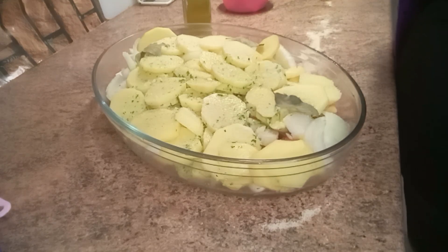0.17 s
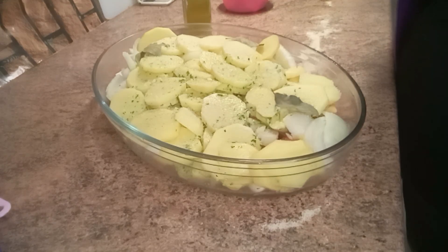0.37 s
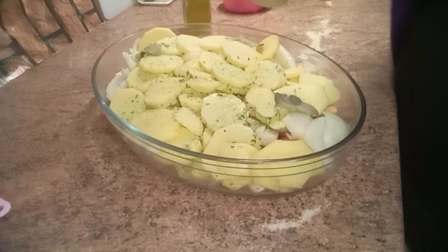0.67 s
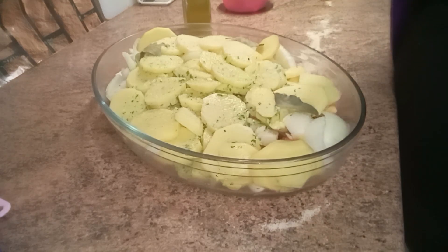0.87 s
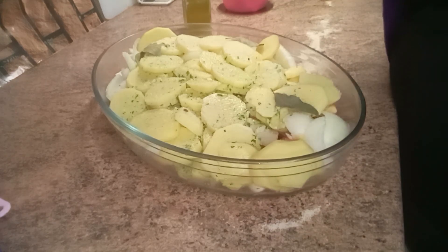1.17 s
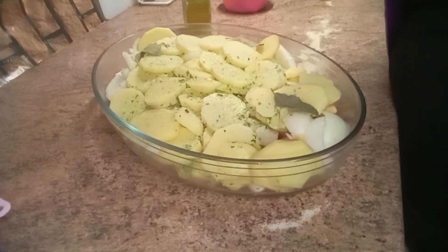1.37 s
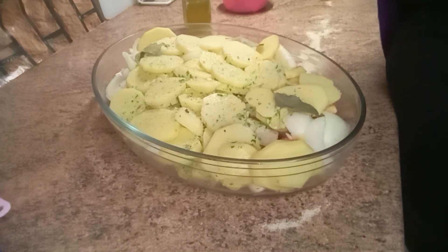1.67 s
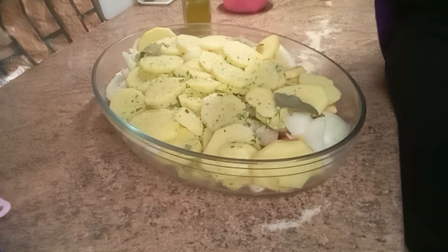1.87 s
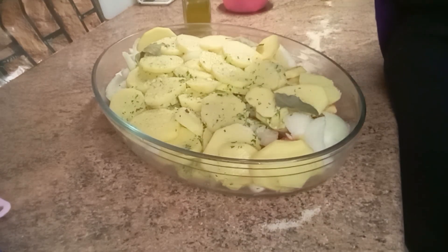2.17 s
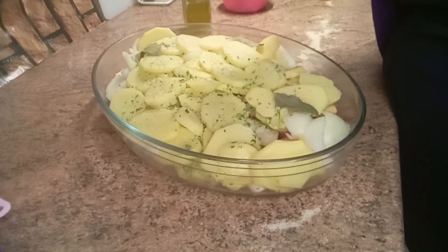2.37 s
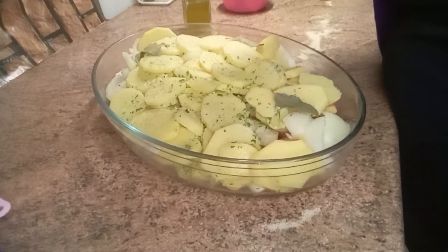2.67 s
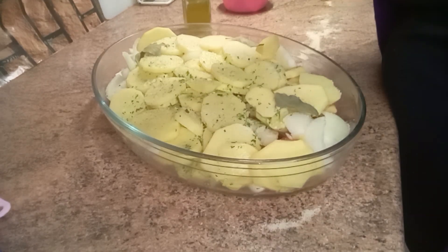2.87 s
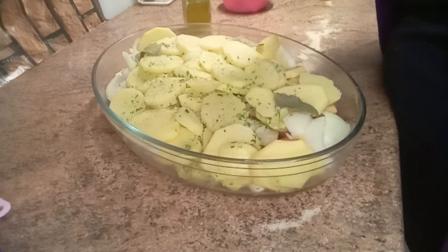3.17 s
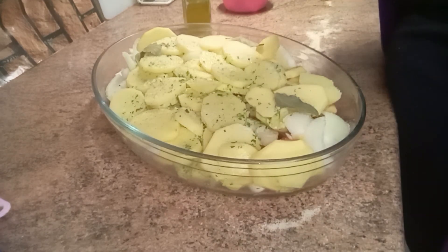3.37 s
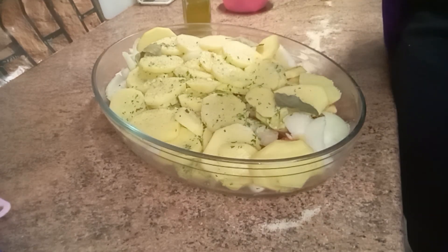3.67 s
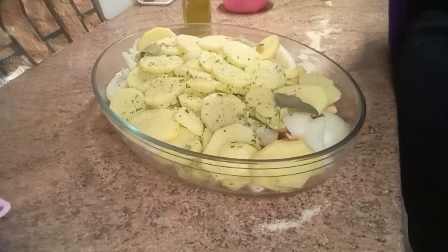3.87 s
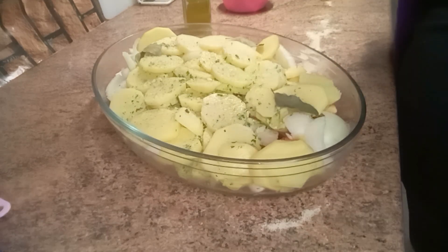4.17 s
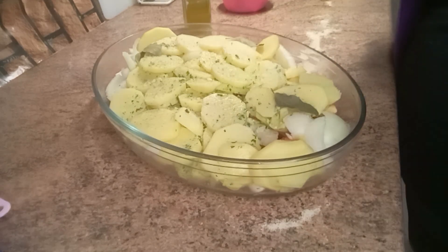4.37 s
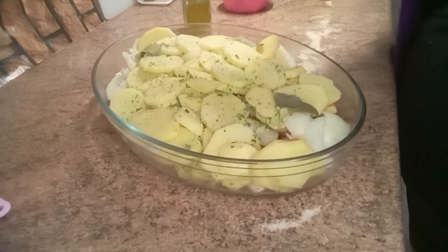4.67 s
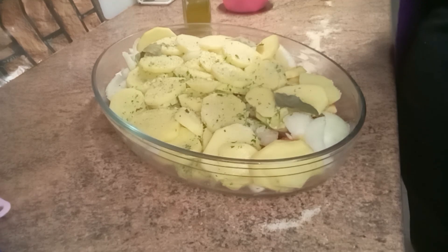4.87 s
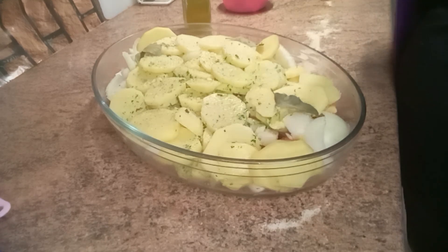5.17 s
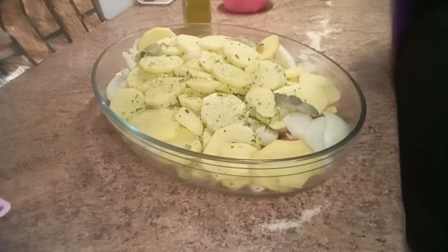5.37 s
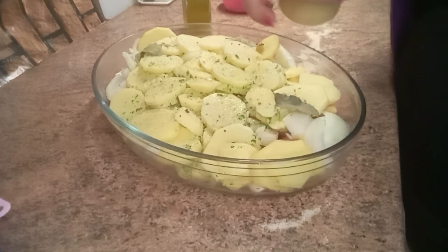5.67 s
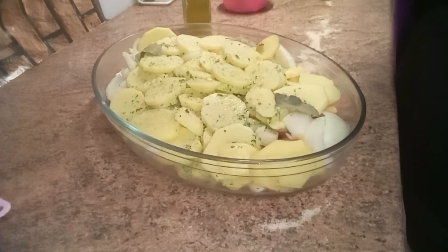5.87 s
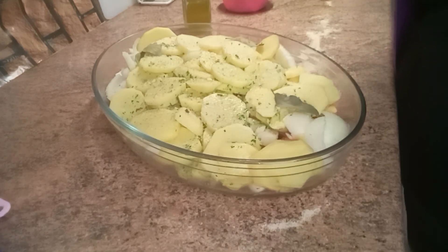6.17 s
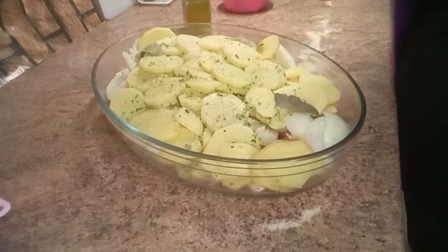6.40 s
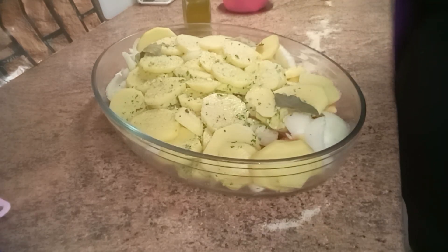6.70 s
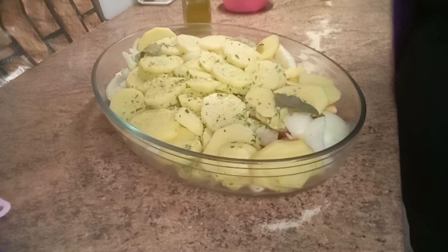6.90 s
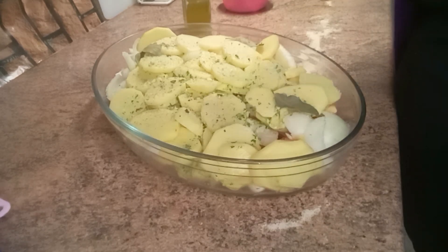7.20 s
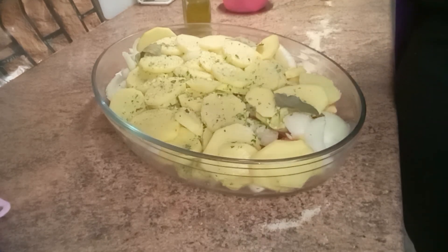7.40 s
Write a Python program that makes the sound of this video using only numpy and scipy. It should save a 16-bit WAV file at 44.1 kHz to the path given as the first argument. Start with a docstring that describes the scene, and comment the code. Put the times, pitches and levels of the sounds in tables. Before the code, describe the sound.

For about 7.5 seconds a pepper mill is ground by hand in a steady rhythm, one twist roughly every 0.4 seconds. The first crunch is already under way at 0; others bite near 0.4, 0.75, 1.2, 1.6 and 2.0, continuing evenly to a last one at 7.3. Each is a dry, gritty burst of 0.1 to 0.2 seconds with sharp cracks, then crumbs settle into sparse ticks, and a faint bright scrape swells into the next bite. Especially hard cracks come near 1.6, 2.95, 4.6, 5.75 and loudest at 6.5-6.6. Small hollow knocks fall around 1.85, 4.1 and 6.5, a faint low bump at 5.4, and tiny squeaks near 1.1, 2.0 and 5.7. The hard kitchen adds a short, bright echo. Quiet rumbling room tone, faint fridge hum and wavering thin hiss lie beneath.

```python
"""Pepper mill in a kitchen.

A pepper mill is twisted by hand, some five twists in two seconds, over a dish in a hard-walled kitchen.
Peppercorns crack as filtered noise bursts, crumbs crunch as dense random snaps, and the room rings on
as noise tails. Single ticks, scrapes up to the bites, knocks and one bump of the mill join in.
A fridge hums behind as wavering sines, over room tone and a thin hiss; now and then a gliding sine whistles."""
import sys
import numpy as np
from scipy import signal
from scipy.fft import rfft, irfft
from scipy.io import wavfile
from scipy.ndimage import uniform_filter1d

SR = 44100
rng = np.random.default_rng(int(sys.argv[2]) if len(sys.argv) > 2 else 0)


def store_pcm(level_fs):
    """Save levels as 16-bit WAV."""
    pcm = np.round(np.clip(level_fs, -1, 1) * 32767).astype(np.int16)
    wavfile.write(sys.argv[1], SR, np.atleast_2d(pcm).T)


N = 332514

# The cracks and ticks that stand out. Each row: start in seconds, peak in dB, bass in dB and treble in dB
# against the mill's usual colour, ring in Hz.
BIG_CRACKS = [(0.019, -29.5, 23, 19, 6540), (0.086, -29.5, -8, 0, 5950), (0.311, -51, -14, -8, 4700),
              (0.3595, -35, 1, -9, 4690), (0.372, -15, 7.5, -8, 4500), (0.382, -18, -2, 10, 4930),
              (0.4018, -24, -3, -3, 4500), (0.4408, -21.5, -11, -1.5, 4660), (0.468, -22.5, 8.5, 3, 4510),
              (0.827, -15, 11.5, -1, 1836), (0.865, -28.5, 15, -6.5, 4920), (.878, -14.5, -3, 7, 6330),
              (0.885, -16.5, 1, 3, 5000), (1.2235, -15.5, -24, -1, 4760), (1.2399, -14, -4, 11.5, 6780),
              (1.263, -24, 15, 10, 6970), (1.2862, -17, 8, 7, 1970), (1.611, -10, 3, -7, 4370),
              (1.637, -13.5, 3, 6.5, 4400), (1.662, -23, 11, -3, 4400), (1.7128, -20.5, -4.5, -3, 7600),
              (1.7512, -25, 3, 8, 7300), (2.0123, -28.5, 11.5, -2, 1004), (2.0554, -14.5, -6, -1, 4400),
              (2.0666, -18, 5.5, -5, 4550), (2.11, -22.5, 1.5, 2, 1373), (2.152, -29, 5, -15, 2324),
              (2.205, -40.5, -8, -8, 5370), (2.377, -54.5, 8.5, -10, 5000), (2.432, -21, -26, -10, 4810),
              (2.4463, -18, 13.5, 1, 6200), (2.4638, -19, -5.5, 1, 6480), (2.4815, -28, 9, -9.5, 5960),
              (2.5158, -20.5, 1, 2.5, 5830), (2.849, -33.5, -18, -23, 5160), (2.9011, -18.5, 0, 3, 3470),
              (2.9166, -23.5, 10, -2, 5330), (2.9568, -9, 0.5, 10, 12800), (2.993, -22, -1.5, 2.5, 6900),
              (3.073, -32, -15, 20, 8900), (3.132, -34, -13, 12, 6200), (3.208, -49, -13, 17.5, 6400),
              (3.22, -49.5, -1, 3, 6300), (3.289, -20.5, -10, -1, 6940), (3.3091, -14.5, -2, -9, 7100),
              (3.3952, -23, 0, -2.5, 7240), (3.408, -21.5, 0, -2, 5200), (3.637, -53, -5.5, 23, 8610),
              (3.6929, -29, -14, -30, 4260), (3.707, -32, -0.5, -24.5, 4100),
              (3.7825, -21.5, -1.5, -5, 4210), (3.798, -23.5, -7, 0.5, 4140), (3.8195, -26, -14, 6.5, 4110),
              (4.1308, -30.5, 6, -15.5, 4240), (4.138, -17.5, 0, -2.5, 4255), (4.17, -18, -1, 4, 5170),
              (4.1761, -23.5, -9, 6.5, 5000), (4.196, -26, 3, -3, 3200), (4.2534, -28, -2.5, -11.5, 4470),
              (4.5185, -22.5, -6, -5.5, 940), (4.5235, -16.5, 2, 2, 935), (4.589, -21.5, 3, 2, 1510),
              (4.595, -9, 3, 3.5, 5600), (4.758, -40.5, -1, 2.5, 7130), (4.802, -51, 8, 11.5, 5500),
              (4.9711, -26.5, 8.5, -22.5, 5900), (4.981, -38.5, 6, -2.5, 2740),
              (5.0766, -28.5, 5, 11.5, 6670), (5.1928, -23.5, -13, 21.5, 5240),
              (5.3019, -42, -4.5, -0.5, 6550), (5.349, -26.5, -18, -4.5, 5520),
              (5.362, -19.5, -11, -9, 4080), (5.3727, -12.5, -2, 1, 4310), (5.4147, -21.5, -15, 5, 4320),
              (5.4612, -14.5, -6.5, 1.5, 1917), (5.4834, -22.5, -25, -18, 5600),
              (5.6005, -37, -1, 10.5, 6890), (5.716, -24, -4.5, 2.5, 4400), (5.7302, -19, -14, -14.5, 2660),
              (5.7416, -10.5, -2, -3.5, 4400), (5.752, -17.5, -4, 3, 4650), (5.77, -20.5, 7.5, 9.5, 6500),
              (5.789, -22.5, 12.5, 6, 6600), (5.8484, -27.5, 7, 4.5, 5960), (6.108, -51, -8, 14, 9390),
              (6.1499, -17.5, 2, -2, 2174), (6.248, -37.5, -3, 12, 8950), (6.499, -28, -3, -12, 4600),
              (6.528, -20.5, 18.5, 17, 6700), (6.538, -8.5, -47, -20, 4540), (6.5544, -24.5, -2, 3, 4130),
              (6.5995, -3.5, -4.5, -10, 2405), (6.61, -8, -13, 10.5, 5200), (6.945, -15.5, -3, -3, 4300),
              (6.9556, -14.5, 2.5, -2, 4760), (7.027, -19.5, -3.5, -16, 4030), (7.033, -21, 6, 5, 4530),
              (7.1572, -29.5, -15.5, 21, 6200), (7.203, -31.5, -31, 25, 7620), (7.298, -23, -1, 6, 6670),
              (7.361, -26.5, 12, -3, 3680)]
# Turns of the hand. Each row: bite of the burrs in seconds, length in seconds, crunch in dB at the bite,
# crunch in dB as the hand stops, scrape in dB just before the bite, swell in dB per second, treble in dB.
HAND_TURNS = [(0.0, 0.082, -34.5, -52, -70, 1700, 2.5), (0.373, 0.12, -41, -47, -64, 1500, 0),
              (0.751, 0.15, -45, -38.5, -71, 1700, 0), (1.218, 0.12, -36, -47.5, -56, 600, 1),
              (1.602, 0.15, -43.5, -47, -70, 1700, 0), (2.004, 0.15, -45, -52, -61, 2498, 3.5),
              (2.447, 0.11, -36, -44.5, -73, 1002, 0.5), (2.849, 0.17, -45.5, -37, -66.5, 1500, -1),
              (3.288, 0.15, -38, -45.5, -62.5, 900, -1.5), (3.703, 0.11, -49, -39, -74, 1402, -3),
              (4.135, 0.13, -42, -55.5, -72.5, 1700, 2.5), (4.527, 0.14, -43, -44.5, -73.5, 1702.5, -1.5),
              (4.949, 0.11, -45, -47.5, -78, 1197, 1.5), (5.372, 0.081, -30.5, -64, -72.5, 1197, -2),
              (5.727, 0.13, -44, -48.5, -73, 1497, 1), (6.133, 0.12, -38, -49, -68, 1500, 0.5),
              (6.501, 0.2, -39, -41, -71, 1703, 3), (6.933, 0.13, -30.5, -53.5, -58.5, 803, 0),
              (7.304, 0.1158, -37.5, -50.5, -81, 1700, -2.5)]

TREBLE_HZ = 7150   # where the treble of cracks and crunch begins
SIZE = 4096   # samples in a filter response
HZ = np.maximum(np.fft.rfftfreq(SIZE, 1 / SR), 1)


def from_db(db):
    """Decibels to gain."""
    return 10 ** (np.asarray(db) / 20)


def rms_one(x):
    """Scale to rms 1."""
    return x / np.sqrt(np.mean(x ** 2) + 1e-20)


def at_hz(points, hz):
    """Read a table on a log-frequency axis."""
    table_hz, values = np.transpose(points)
    return np.interp(np.log(hz), np.log(table_hz), values)


def drift(rate_hz):
    """Slow chance: noise at every 16th sample, twice through a one-pole low-pass; spread 1."""
    pole = np.exp(-2 * np.pi * rate_hz * 16 / SR)
    noise = rng.standard_normal(N // 16 + 3002)
    slow = signal.lfilter([1], [1, -2 * pole, pole ** 2], noise)[3000:]   # settled part only
    return np.interp(np.arange(N) / 16, np.arange(len(slow)), rms_one(slow))


def bump(hz, width_hz):
    """Resonance curve, 1 on top, one half at half the width to either side."""
    return 1 / (1 + (2 * (HZ - hz) / width_hz) ** 2)


def causal(db):
    """Minimum-phase spectrum for a dB curve, by folding its cepstrum."""
    cepstrum = irfft(np.log(from_db(db)))
    cepstrum[..., 1:SIZE // 2] *= 2
    cepstrum[..., SIZE // 2 + 1:] = 0
    return np.exp(rfft(cepstrum))


def colour(x, db):
    """Causal filter of unit power gain."""
    response = irfft(causal(db))
    return signal.fftconvolve(x, response / np.sqrt(np.sum(response ** 2)))[:N]


def room_tone(wander_db):
    """Steady coloured noise whose rumble swells and sinks."""
    # Colour of the air in the room. Each row: frequency in Hz, relative level in dB per Hz.
    air_colour = [(25, -23.5), (50, -1), (100, 1), (250, -2.5), (500, -10.5), (1000, -15.5), (2000, -17),
                  (3600, -29.5), (4800, -32.5), (7000, -21), (8200, -25), (13400, -29.5), (14900, -26.5),
                  (16500, -29)]
    air = from_db(-73) * colour(rng.standard_normal(N), at_hz(air_colour, HZ))
    rumble = signal.sosfilt(signal.butter(1, 400, fs=SR, output="sos"), air)
    swell = from_db(wander_db * drift(8.7))
    return air + (swell - 1) * rumble


def fridge(waver_db):
    """Multiples of the motor speed, each wavering on its own in level and phase."""
    # Each row: multiple of the motor speed, rms level in dB.
    hum_lines = [(2, -90.5), (5, -79.5)]
    motor_hz = 48.5
    turn = 2 * np.pi * motor_hz * np.arange(N) / SR
    out = np.zeros(N)
    for multiple, db in hum_lines:
        level = np.sqrt(2) * from_db(db + waver_db * drift(6.2))
        out += level * np.sin(round(multiple) * turn + 0.9 * drift(9.8))
    return out


def thin_hiss(throb_db):
    """Noise through one narrow resonance; it comes and goes and throbs unsteadily."""
    # Each row: time in seconds, level in dB before the throb.
    hiss_levels = [(0, -84.5), (1.3, -73.5), (1.9, -90), (2.3, -100), (5.4, -100), (5.7, -89.5),
                   (6.45, -77.5), (6.8, -95.5), (7.54, -101)]
    centre_hz, width_hz = 7350, 450
    hiss = colour(rng.standard_normal(N), 40 * np.log10(bump(centre_hz, width_hz)))   # resonance squared
    level_db = np.interp(np.arange(N) / SR, *np.transpose(hiss_levels))
    return from_db(level_db + throb_db * drift(6.5)) * hiss


def effort():
    """Crunch level: swell, steady turn and stop for each twist, plus the shards of every big crack."""
    stop_db_per_s = 698.5   # how fast the crunch dies after the stop
    shards_db, shards_s = -32, 0.00192   # a split corn feeds the crunch: level against its crack, decay time
    t = np.arange(0, N, 40) / SR
    level = np.zeros(len(t))
    for s, length, first_db, last_db, _, swell_db_per_s, _ in HAND_TURNS:
        turn_db = np.interp(t, [s, s + length], [first_db, last_db])
        before_db = swell_db_per_s * np.maximum(s - t, 0)
        after_db = stop_db_per_s * np.maximum(t - s - length, 0)
        level += from_db(turn_db - before_db - after_db)
    s, peak_db = np.transpose(BIG_CRACKS)[:2]
    splits = np.zeros(N)
    splits[(s * SR).astype(int)] = from_db(peak_db + shards_db)
    shards = signal.lfilter([1], [1, -np.exp(-1 / (shards_s * SR))], splits)
    return np.interp(np.arange(N) / SR, t, level) + shards


def crunch(per_s, spread_db, lumps_db, count=16):
    """Crumbs snap at random with very uneven sizes, each in a pitch range, in lumps as the burrs bite."""
    shift_db, shifts_hz = 4, 22   # each pitch range swells and sinks on its own
    treble_rise_s = .018   # the crunch starts dull; its treble grows in this slowly
    dust_db = -2.5   # fine dust: smooth hiss in the treble, against the crumbs' snaps
    sizes = from_db(spread_db * np.minimum(rng.exponential(1, N), 5)) * rng.choice([-1, 1], N)
    snaps = sizes * (rng.random(N) < per_s / SR) * from_db(lumps_db * drift(38.0))

    dealt = rng.integers(0, count, N)   # the pitch range of each snap
    edges = np.geomspace(300, 17000, count + 1)
    pitched = np.zeros((count, N))
    for k in range(count):
        band = signal.butter(2, edges[k:k + 2], "band", fs=SR, output="sos")
        ringing = signal.sosfilt(band, snaps * (dealt == k) + 1e-18)
        pitched[k] = from_db(shift_db * drift(shifts_hz)) * ringing

    level = uniform_filter1d(effort(), size=100)
    slow = np.exp(-1 / (treble_rise_s * SR))
    risen = np.minimum(level, signal.lfilter([1 - slow], [1, -slow], level))
    treble_db = np.interp(np.arange(N) / SR, *np.transpose(HAND_TURNS)[[0, -1]])
    treble_level = from_db(treble_db) * risen

    bright = edges[1:] > TREBLE_HZ
    top = pitched[bright].sum(axis=0)
    high_pass = signal.butter(4, TREBLE_HZ, "high", fs=SR, output="sos")
    dust = signal.sosfilt(high_pass, rng.standard_normal(N)) * from_db(lumps_db * drift(30.0))
    top = from_db(-1) * top + from_db(dust_db) * np.std(top) * rms_one(dust)
    low = pitched[~bright].sum(axis=0)
    return (level * low + treble_level * top) / np.std(pitched.sum(axis=0))


def strays(spread_db):
    """Loose crumbs tick inside the mill at all times: sparse faint noise bursts, thin in the bass."""
    per_s, typical_db = 16, -69   # level before the filters
    levels = from_db(typical_db + spread_db * rng.standard_normal(N))
    ticks = (rng.random(N) < per_s / SR) * levels
    grit = signal.lfilter([1], [1, -np.exp(-1 / (0.0007 * SR))], ticks) * rng.standard_normal(N)
    return signal.sosfilt(signal.butter(2, 3500, "high", fs=SR, output="sos"), grit)


def small_corns(count=15):
    """Lesser corns split at random in every turn and as it settles, as rows like the big cracks."""
    settle_s, settle_db_per_s = .12, 171.5   # crumbs go on rattling after the stop, ever fainter
    against_crunch_db, spread_db, colour_db = 1, 4, 8   # the last two: scatter in size and in colour
    s, length, first_db, last_db = np.repeat(HAND_TURNS, count, axis=0).T[:4]
    when = rng.random(len(s)) * (length + settle_s)
    size, bass, treble = rng.standard_normal((3, len(s)))
    ring_hz = 1200 * 5.8 ** rng.random(len(s))
    turn_db = first_db + np.minimum(when / length, 1) * (last_db - first_db)
    settled_db = settle_db_per_s * np.maximum(when - length, 0)
    peak_db = turn_db - settled_db + against_crunch_db + spread_db * size
    return np.transpose([s + when, peak_db, colour_db * bass - 6.0, colour_db * treble - 10.5, ring_hz])


def cracks(mill_db, rise_s, die_s, ring_db, sharpness, steepness):
    """Each corn splits in a few milliseconds of splintering and sets one part of the mill ringing."""
    bass_hz = 2200   # the bass of a crack lies below this
    corns = np.vstack([BIG_CRACKS, small_corns()])
    s, peak_db, bass_db, treble_db, ring_hz = corns.T[:, :, None]
    t = np.arange(SR // 40) / SR
    dying = np.exp(-t / (die_s * rng.uniform(.7, 1.5, (len(s), 1))))
    envelope = np.minimum(t / rise_s, 1) * dying

    bass = bass_db / (1 + (HZ / bass_hz) ** steepness)
    treble = treble_db / (1 + (TREBLE_HZ / HZ) ** steepness)
    own_db = mill_db + bass + treble + ring_db * bump(ring_hz, ring_hz / sharpness)
    for share in rng.random((4, len(s), 1)):   # lesser rings at chance pitches
        lesser_hz = 900 * 8 ** share
        own_db = own_db + .5 * ring_db * bump(lesser_hz, lesser_hz / sharpness)

    splinters = rng.standard_normal((len(s), len(t))) * envelope
    sounds = irfft(rfft(splinters, SIZE) * causal(own_db))
    # the filter changes the colour of a crack, not its level
    energy = np.sum(sounds ** 2, axis=1, keepdims=True) / np.sum(envelope ** 2, axis=1, keepdims=True)
    sounds = from_db(peak_db) * sounds / np.sqrt(energy)
    out = np.zeros(N + SIZE)
    for at, crack in zip((s[:, 0] * SR).astype(int), sounds):
        out[at:at + SIZE] += crack
    return out[:N]


def kitchen(x, first_echo_s, hold=4096):
    """Diffuse echo off hard walls: half-octave bands of noise, each dying at its own rate."""
    # Each row: frequency in Hz, time in seconds for the echo to fall by 60 dB.
    echo_t60 = [(500, 0.29), (1000, 0.28), (2000, 0.27), (2800, 0.35), (4000, 0.3052), (5600, 0.33),
                (8000, 0.21), (15000, 0.2)]
    t = np.arange(SR // 2) / SR
    # the mill moves in the hand, so every short stretch meets a new echo pattern
    stretches = np.pad(x, (0, -N % hold)).reshape(-1, hold)
    white = rfft(rng.standard_normal((len(stretches), len(t))))
    hz = np.fft.rfftfreq(len(t), 1 / SR)
    tails = 0
    for centre_hz in 250 * 2. ** np.arange(0, 6.5, .5):
        band = np.clip(1 - 2 * np.abs(np.log2(hz / centre_hz + 1e-9)), 0, 1)   # neighbours sum to one
        tails = tails + irfft(white * band) * from_db(-60 * t / at_hz(echo_t60, centre_hz))
    tails = tails * np.clip(t / first_echo_s - 1, 0, 1)   # silent until the first echo
    tails = tails / np.sqrt(np.sum(tails ** 2) / len(tails))   # mean energy 1
    out = np.zeros(N + SR)
    for k, echo in enumerate(signal.fftconvolve(stretches, tails, axes=1)):
        out[k * hold:k * hold + len(echo)] += echo
    return out[:N]


def scrape(lumps_db):
    """The burrs scrape faintly before they bite: narrow bright hiss that swells up to each bite."""
    # Resonances of the scrape. Each row: frequency in Hz, width in Hz, relative level in dB.
    scrape_modes = [(4400, 350, -3.5), (5000, 500, -1.5), (6200, 370, -2), (2200, 2000, -14.5)]
    creep_db_per_s = 190   # rate of the swell
    t = np.arange(0, N, 40) / SR
    level = np.zeros(len(t))
    for bite_s, _, _, _, scrape_db, _, _ in HAND_TURNS:
        level += from_db(scrape_db - creep_db_per_s * np.abs(bite_s - t)) * (t < bite_s)
    resonance = sum(from_db(db) * bump(hz, width_hz) for hz, width_hz, db in scrape_modes)
    hiss = colour(rng.standard_normal(N), 20 * np.log10(resonance))
    return np.interp(np.arange(N) / SR, t, level) * from_db(lumps_db * drift(60.0)) * hiss


def whistles(throb_db, waver_hz):
    """Faint whistles and squeaks: gliding sines that waver, throb quickly and fade at both ends."""
    # Each row: start in seconds, length in seconds, first pitch in Hz, last pitch in Hz,
    # rms level in dB before the throb.
    glides = [(2, 0.063, 7180, 7180, -60), (1.048, 0.09, 7050, 6960, -61.5),
              (1.111, 0.03, 7260, 7284, -70.5), (1.078, 0.026, 8800, 7900, -79),
              (1.833, 0.033, 7100, 7050, -67),
              (5.687, 0.042, 7400, 7500, -66)   , (5.9, 0.12, 7700, 7260, -76),
              (6.3, 0.11, 8100, 7360, -80), (3.5, 0.03, 2195, 2120, -67), (4.341, 0.044, 2090, 2150, -67.5)]
    t, out, waver = np.arange(N) / SR, np.zeros(N), waver_hz * drift(70.0)
    for s, length, first_hz, last_hz, db in glides:
        span = slice(int(s * SR), int((s + length) * SR))
        to_nearest_end = np.minimum(t[span] - s, s + length - t[span])
        fade = np.clip(to_nearest_end / 0.0085, 0, 1)
        hz = np.interp(t[span], [s, s + length], [first_hz, last_hz]) + waver[span]
        out[span] += np.sqrt(2) * fade * from_db(db) * np.sin(2 * np.pi * np.cumsum(hz) / SR)
    return out * from_db(throb_db * drift(90.0))


def knocks():
    """The mill's body knocks as the hand regrips: each knock strikes the low and bright modes once."""
    # Each row: start in seconds, level in dB, lowest mode in Hz, bright part in dB.
    regrips = [(1.8471, -40, 1125, 7), (2.7954, -49.5, 1413, -20), (3.242, -49, 1075, -15.5),
               (4.0925, -34.5, 1063, -3.5), (5.2876, -51.5, 1110, -2.5), (6.4679, -33.5, 1076, 1)]
    # Low modes. Each row: multiple of the lowest, relative level in dB, time in seconds to fall by 60 dB.
    low_modes = [(1.0, 0, .016), (1.35, -4, .011), (1.9, -1, .009), (2.3, -4, .009)]
    # Bright modes. Each row: frequency in Hz, relative level in dB, time in seconds to fall by 60 dB.
    bright_modes = [(4300, -3, .006), (5000, 0, .007), (5600, -1, .006), (6300, -5, .005)]
    out, t = np.zeros(N), np.arange(SR // 20) / SR
    for s, db, lowest_hz, bright_db in regrips:
        modes = [(multiple * lowest_hz, mode_db, t60) for multiple, mode_db, t60 in low_modes]
        modes += [(hz, mode_db + bright_db, t60) for hz, mode_db, t60 in bright_modes]
        knock = np.zeros(len(t))
        for hz, mode_db, t60 in modes:
            ring = np.sin(2 * np.pi * (hz * t + rng.random()))
            knock += from_db(db + mode_db - 60 * t / t60) * ring
        out[int(s * SR):][:len(t)] += np.minimum(t / .0015, 1) * knock
    return out


def thump():
    """The hand bumps the mill: one low dying sine."""
    # One row: start in seconds, pitch in Hz, peak in dB, time in seconds to fall by 60 dB.
    hand_bump = (5.371, 320, -55, .15)
    s, hz, db, t60 = hand_bump
    t = np.maximum(np.arange(N) / SR - s, 0)
    return from_db(db - 60 * t / t60) * np.sin(2 * np.pi * hz * t)


def scene():
    """Mill and its echo over the room tone, the fridge, the hiss and the whistles."""
    # Mill and microphone together. Each row: frequency in Hz, relative level in dB per Hz.
    mill_colour = [(180, -65), (300, -31.5), (462, -21), (960, -10), (2100, -5.5), (2390, -3.5),
                   (3170, -6.5), (4730, -3), (6480, -5.5), (8180, -18), (10300, -17.5), (12200, -27.5),
                   (13700, -35.5), (14700, -19), (15900, -21.5)]
    # Mill resonances. Each row: frequency in Hz, width in Hz, lift in dB.
    mill_modes = [(2466, 110, 0), (4106, 42, 6.5), (4690, 950, 5.5), (6540, 1600, 6.5), (9260, 470, 4)]
    mill_db = at_hz(mill_colour, HZ)
    mill_db = mill_db + sum(lift_db * bump(hz, width_hz) for hz, width_hz, lift_db in mill_modes)
    crumbs = colour(crunch(per_s=6500.0, spread_db=3.1, lumps_db=3.8), mill_db)
    ticks = colour(strays(spread_db=3.0), mill_db)
    corns = cracks(mill_db, rise_s=0.0019, die_s=0.002, ring_db=7.0, sharpness=5.0, steepness=6.0)
    mill = corns + crumbs + ticks + scrape(lumps_db=1.0) + knocks()
    echo = from_db(-5.5) * kitchen(mill, first_echo_s=0.0017)
    behind = room_tone(wander_db=4.0) + fridge(waver_db=3.5)
    behind = behind + thin_hiss(throb_db=4.0) + whistles(throb_db=4.0, waver_hz=45.0)
    return (mill + echo + thump() + behind)[None]   # one channel


def record(dry):
    """The top is cut steeply, 60 dB down from 16200 Hz upward."""
    return signal.sosfilt(signal.cheby2(20, 60, 16200, fs=SR, output="sos"), dry)


dry = scene()
out = record(dry)
store_pcm(out)
```